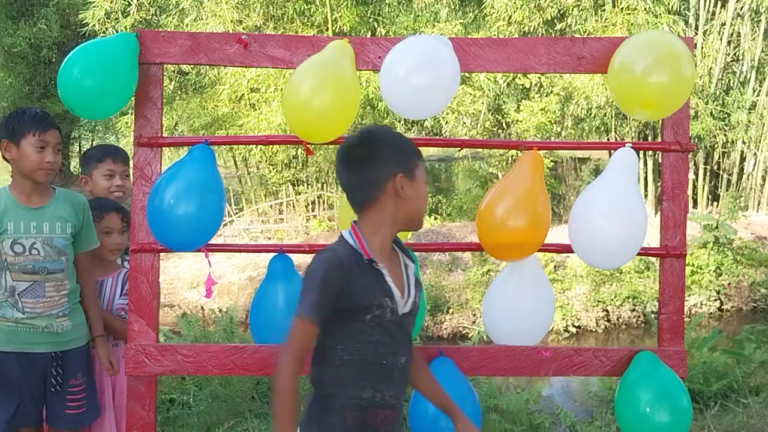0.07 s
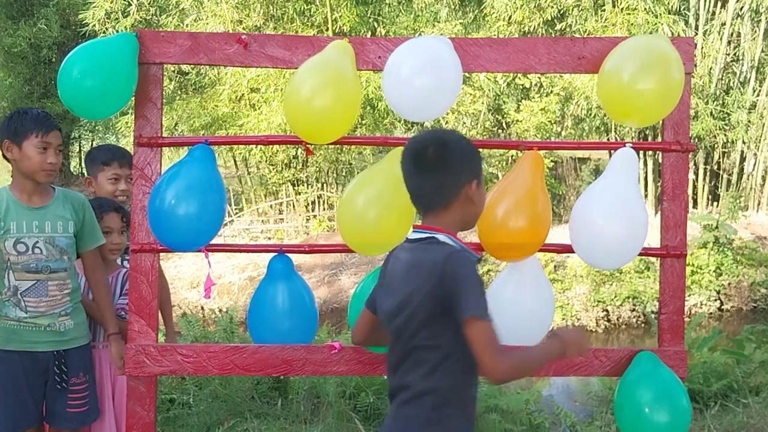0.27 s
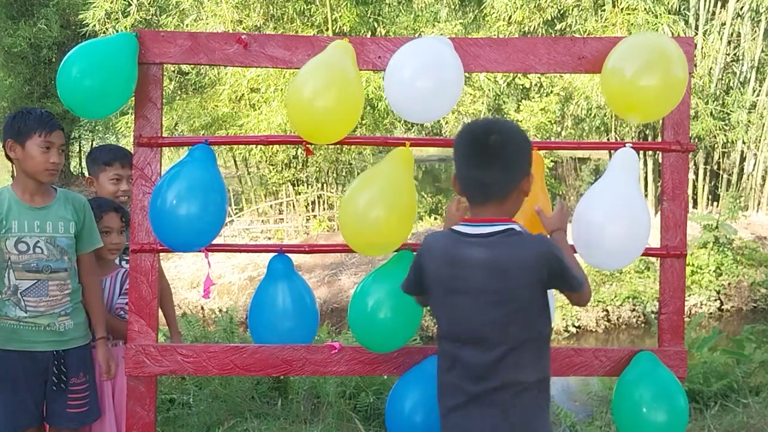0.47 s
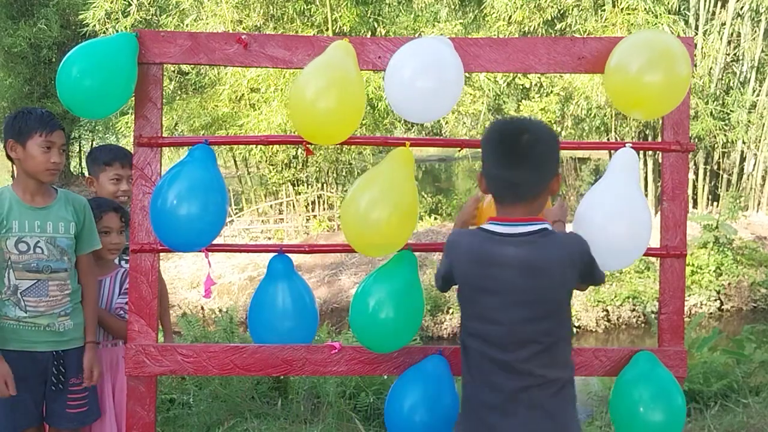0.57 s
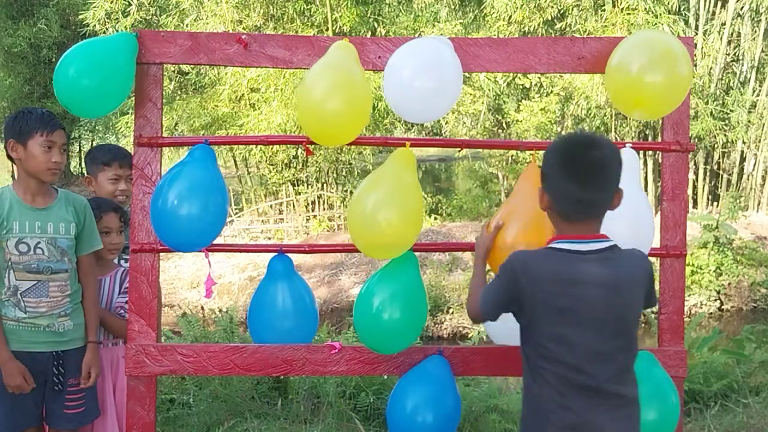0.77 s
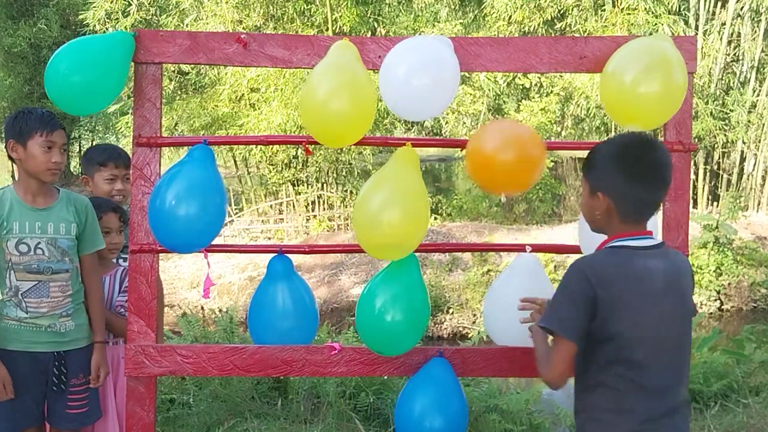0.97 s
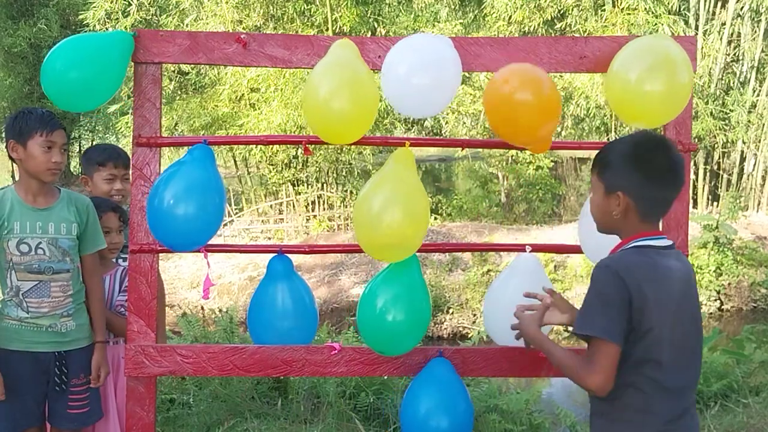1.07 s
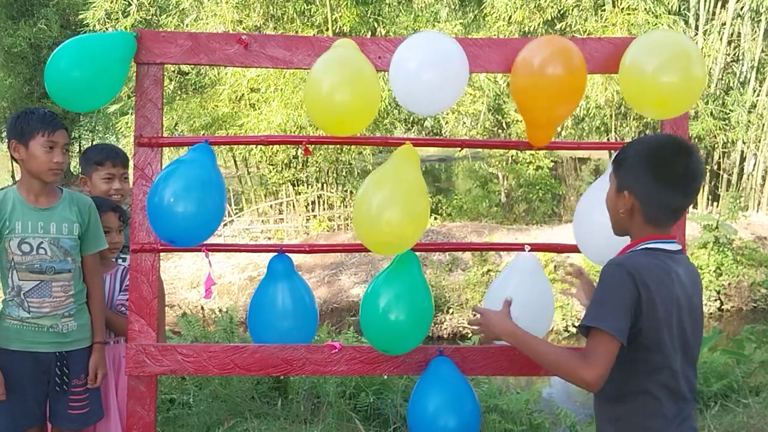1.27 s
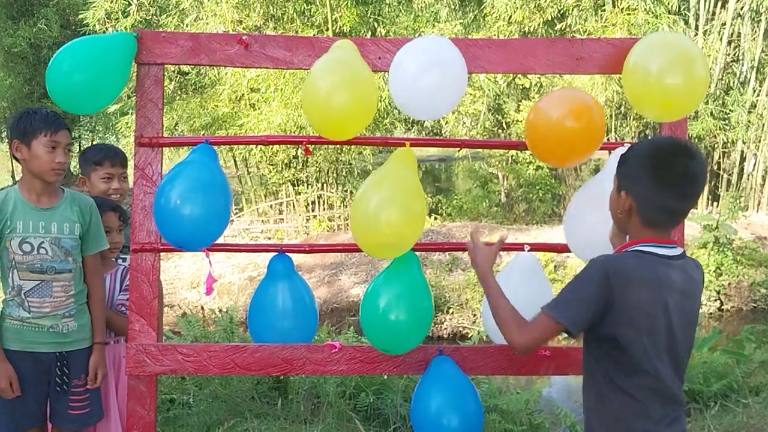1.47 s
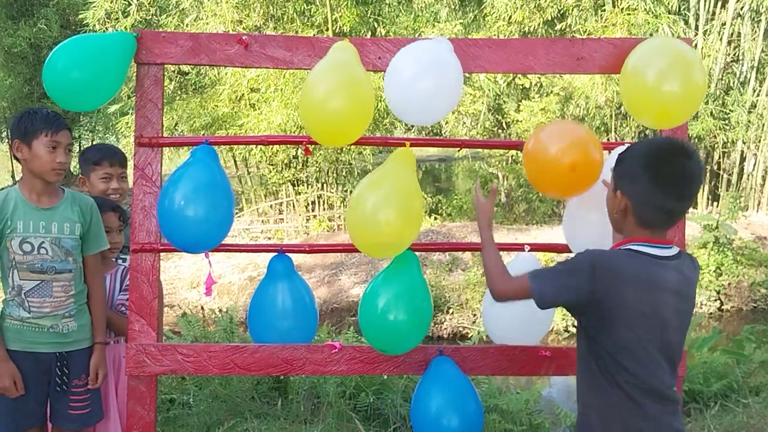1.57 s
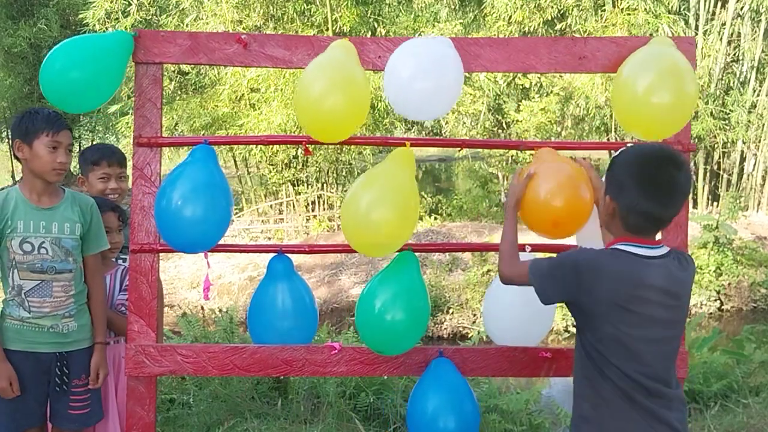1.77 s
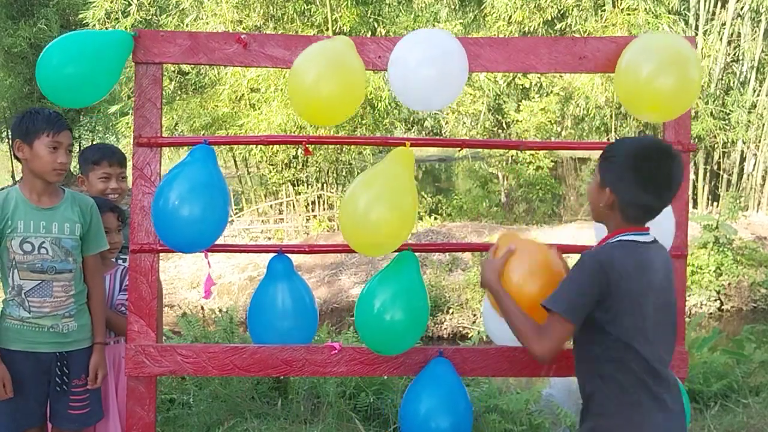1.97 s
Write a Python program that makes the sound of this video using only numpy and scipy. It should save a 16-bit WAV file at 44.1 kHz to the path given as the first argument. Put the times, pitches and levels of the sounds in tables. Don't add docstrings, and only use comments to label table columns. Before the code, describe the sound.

Hollow rubbery balloon pats and squeaky rubs in a quiet grove, ending in a loud burst

```python
import sys
import numpy as np
from scipy import signal
from scipy.fft import rfft, irfft, next_fast_len
from scipy.io import wavfile
from scipy.ndimage import map_coordinates

SR = 44100
rng = np.random.default_rng(int(sys.argv[2]) if len(sys.argv) > 2 else 0)


def boost_factor(decibels):
    exponent = np.asarray(decibels, float) / 20
    return 10 ** exponent


def waveform_to_disk(signal):
    frames = np.transpose(np.atleast_2d(signal))
    scaled = np.clip(frames, -1, 1) * 32767
    samples = np.round(scaled).astype(np.int16)
    wavfile.write(sys.argv[1], SR, samples)


N = 88420


def unit(x):
    return x / np.sqrt(np.mean(x ** 2) + 1e-20)


def along(points, hz):
    f, v = np.transpose(points)
    return np.interp(np.log(hz + 1), np.log(f + 1), v)


def curve(points):
    s, v = np.transpose(points)
    return np.interp(np.arange(N) / SR, s, v)


def wobble(rate):
    return map_coordinates(rng.standard_normal(400), [np.arange(N) * rate / SR], mode="wrap")


def filtered(x, response):
    m = next_fast_len(N + SR // 2)
    return irfft(rfft(x, m) * response(np.fft.rfftfreq(m, 1 / SR)), m)[..., :N]


def rush(gain):
    # frequency in Hz, left-right likeness (correlation).
    likeness = [(60, 0.89), (180, 0.78), (550, -0.23), (1650, 0.4), (4970, -0.25), (15000, -0.23)]

    def mid_side(hz):
        turn = np.arccos(np.clip(along(likeness, hz), -1, 1)) / 2
        return gain(hz) * [np.cos(turn), np.sin(turn)]

    mid, side = filtered(rng.standard_normal((2, N)), mid_side)
    return unit(np.array([mid + side, mid - side]))


def shaped(points):
    return lambda hz: boost_factor(along(points, hz)) * (hz > points[0][0]) * (hz < points[-1][0])


def hump(start_s, length_s, sharp):
    return np.sin(np.pi * np.clip((np.arange(N) / SR - start_s) / length_s, 0, 1)) ** sharp


def tone(hz):
    return np.sin(2 * np.pi * np.cumsum(hz) / SR)


def rings(modes, attack_s):
    t = np.arange(SR // 4) / SR
    swell = 1 - np.exp(-t / attack_s)
    return np.array([boost_factor(db - 60 * t / t60_s) * np.sin(2 * np.pi * hz * t) * swell for hz, db, t60_s in modes])


def add(track, s, x):
    part = track[round(s * SR):][:len(x)]
    part += x[:len(part)]


def open_air():
    # frequency in Hz, density in dB per Hz.
    air_spectrum = [(88, -32), (150, 3), (454, -18.5), (844, -17.5), (2870, -26.5), (5660, -18),
                    (9010, -26), (10500, -26), (15500, -30)]
    return boost_factor(-67.5 + wobble(4.8)) * rush(shaped(air_spectrum))


def rumble():
    # frequency in Hz, density in dB per Hz.
    rumble_spectrum = [(15, -60), (25, -43), (40, -10), (59, 0), (76, -1.5), (92, 1), (250, -35),
                       (320, -26), (550, -120)]
    # time in seconds, level in dB.
    gust_levels = [(0, -59), (.15, -58), (.3, -60.5), (.5, -62), (.7, -54.5), (.95, -63.5), (.985, -62),
                   (1.01, -47), (1.15, -57), (1.3, -56.5), (1.42, -47.5), (1.55, -55), (1.6, -55),
                   (1.64, -53), (1.72, -55.5), (1.78, -48), (1.87, -56), (1.96, -48)]
    return boost_factor(curve(gust_levels) + 2.5 * wobble(14.06)) * rush(shaped(rumble_spectrum))


def chorus():
    # frequency in Hz, density in dB per Hz.
    chorus_spectrum = [(9300, -18), (9700, -7.5), (10200, -3), (10700, -7.5), (11500, -13.5)]
    # time in seconds, level in dB.
    chorus_levels = [(0, -68.5), (.45, -72), (.9, -70), (1.3, -69), (1.45, -65), (2, -64.5)]
    level_db = curve(chorus_levels) + 0.8 * wobble(5.5) + 0.94 * wobble(100)
    return boost_factor(level_db) * rush(shaped(chorus_spectrum)) * boost_factor([[-3], [3]])


def far_echo():
    # time in seconds, level in dB.
    echo_levels = [
        (0, -46),
        (.06, -62),
        (.33, -75),
        (.365, -60.5),
        (.42, -73),
        (.5, -71),
    ]
    # frequency in Hz, density in dB per Hz.
    echo_spectrum = [(800, -15), (930, 4.5), (1200, 2), (1350, -25.5)]
    level_db = curve(echo_levels) + 0.5 + 2.24 * wobble(63.3)
    return boost_factor(level_db) * (np.arange(N) < 0.5 * SR) * rush(shaped(echo_spectrum))


def bird():
    # start in seconds, length in seconds, first and last frequency in Hz, level in dB.
    whistles = [
        (1.36, .085, 3780, 3720, -77),
        (1.445, .08, 3700, 3480, -77),
        (1.642, .085, 4150, 3850, -76),
        (1.722, .05, 3800, 3380, -77),
    ]
    t, out = np.arange(N) / SR, 0
    for s, length_s, from_hz, to_hz, db in whistles:
        hz = np.interp(t, [s, s + length_s], [from_hz, to_hz]) + 30 * wobble(160)
        out = out + boost_factor(db + 1.5 * wobble(80)) * hump(s, length_s, 0.17) * tone(hz)
    return out * boost_factor([[1], [-1]])


def insect(calls, hz, strokes_hz, width_hz):
    t, out = np.arange(N) / SR, 0
    for s, length_s, db in calls:
        strokes = np.sin(np.pi * strokes_hz * (t - s)) ** 2
        out = out + boost_factor(db + 2) * hump(s, length_s, 0.25) * strokes
    note = tone(hz + width_hz * wobble(170))
    return out * boost_factor([[-4], [3]]) * note * boost_factor(1.5 * wobble(60))


def insects():
    # start in seconds, length in seconds, level in dB.
    trill_calls = [
        (.16, .07, -69),
        (.3, .14, -66),
        (.525, .14, -65),
        (.785, .135, -65),
    ]
    chirp_calls = [(.262, .04, -68), (.325, .042, -66), (1.355, .012, -66), (1.44, .012, -63),
                   (1.483, .042, -65), (1.545, .042, -63), (1.617, .042, -63), (1.68, .012, -68)]
    buzz_calls = [
        (.36, .16, -76),
        (1.33, .12, -70),
        (1.45, .3, -77),
    ]
    return (insect(trill_calls, 10700, strokes_hz=108.6, width_hz=110)
            + insect(chirp_calls, 5700, strokes_hz=94, width_hz=50)
            + insect(buzz_calls, 6050, strokes_hz=72, width_hz=290))


def yard(x):
    t60_s, delay_samples = 0.31, 200
    t = np.arange(SR // 4) / SR
    tail = rng.standard_normal((2, len(t))) * boost_factor(-60 * t / t60_s)
    late = np.pad(x, (delay_samples, 0))[None]
    return signal.fftconvolve(late, tail / np.linalg.norm(tail[0]), axes=1)[:, :N]


def swishes():
    # start in seconds, length in seconds, level in dB, centre in Hz.
    slides = [(-.1, 0.13, -51, 2200), (.03, .03, -54, 2000), (.7, .07, -64, 2000), (1.03, .014, -58, 5800),
              (.0, 0.31, -64, 2700), (0.194, 0.058, -61.5, 3800), (0.429, 0.31, -61, 3000),
              (0.605, 0.041, -61.5, 8700), (0.654, 0.073, -47.5, 2400), (0.709, 0.048, -63, 11700),
              (0.718, 0.21, -68.5, 1200), (0.986, 0.019, -57.5, 4400), (0.99, 0.24, -64, 2440),
              (1.009, 0.044, -57.5, 6000), (1.064, 0.0083, -53.5, 6400), (1.14, 0.24, -56.5, 11200),
              (1.164, 0.21, -55.5, 2700), (1.266, 0.3, -66, 2370), (1.28, 0.26, -65, 8400),
              (1.704, 0.13, -59, 8300), (1.769, 0.16, -54, 9200), (1.735, 0.21, -60.5, 2040),
              (0.484, 0.36, -62.5, 13500), (0.916, 0.28, -67, 13500), (1.86, 0.11, -66, 12000),
              (.0, 0.32, -69, 13500), (0.448, 0.023, -69, 4200), (1.343, 0.55, -69.5, 7900),
              (1.748, 0.23, -63, 343), (1.015, 0.18, -55.5, 380), (-.05, 0.098, -60.5, 504)]
    out = 0
    for s, length_s, db, centre_hz in slides:
        octaves = 0.94 * min(1, 20 * length_s) ** 0.5
        hiss = rush(lambda f: np.exp(-0.5 * (np.log2((f + 1) / centre_hz) / octaves) ** 2))
        out = out + boost_factor(db + 1.5 * wobble(190)) * hump(s, length_s, 1.2) * hiss
    return out


def groans():
    # start in seconds, length in seconds, first and last frequency in Hz, level in dB.
    flexes = [
        (1.309, 0.165, 150, 82.7, -46.5),
        (1.739, 0.064, 74.8, 134, -44),
    ]
    t, out = np.arange(N) / SR, 0
    for s, length_s, from_hz, to_hz, db in flexes:
        hz = np.exp(np.interp(t, [s, s + length_s], np.log([from_hz, to_hz])))
        out = out + boost_factor(db + 3.4 * wobble(45.4)) * hump(s, length_s, 0.46) * tone(hz)
    return out


def creaks():
    # start in seconds, peak in dB, length in seconds.
    slip_runs = [(0.662, -55, 0.011), (0.997, -56.5, 0.0067), (1.073, -48, 0.0061), (.038, -49.5, 0.011),
                 (.004, -60, 0.014), (0.749, -60.5, 0.059), (1, -57.5, 0.028), (1.0273, -45, 0.023),
                 (1.065, -46, 0.021), (1.1088, -52, 0.022), (1.121, -54.5, 0.014), (1.1323, -49.5, 0.025),
                 (1.164, -51, 0.022), (1.221, -56, 0.013), (1.2384, -47.5, 0.024), (1.324, -47, 0.021)]
    # centre in Hz, width in Hz, level in dB.
    rubber_modes = [(610, 210, -4.5), (1065, 86, -0.5), (1270, 90, 3), (1654, 168, 0), (2210, 320, -11),
                    (3620, 860, -12), (6000, 1340, -17.5)]
    slips = rng.standard_normal(N) * (rng.random(N) < 0.05)
    drive = sum(boost_factor(db) * hump(s - 0.003, length_s, 0.52) for s, db, length_s in slip_runs) * slips

    def rubber(f):
        total = 0
        for k, (centre_hz, width_hz, db) in enumerate(rubber_modes):
            damping = 1j * f * width_hz
            total = total + (-1) ** k * boost_factor(db) * damping / (centre_hz ** 2 - f * f + damping)
        return total

    return boost_factor(25) * filtered(drive, rubber)


def rubbing():
    # start in seconds, length in seconds, balloon note in Hz, skin level in dB, squeak band level in dB.
    rubs = [
        (-.05, 0.3, 203, -59.5, -72),
        (0.367, 0.21, 322, -79, -72),
        (0.423, 0.4, 353, -57, -64),
        (0.79, 0.2, 320, -69.5, -74),
        (0.977, 0.23, 221, -51.5, -59),
        (1.15, 0.27, 242.5, -47, -62),
        (1.285, 0.36, 243, -53.5, -74),
        (1.719, .23, 203, -55.5, -65.5),
    ]
    squeak_band = shaped([(380, -11.5), (500, -3.0), (800, -2.5), (950, -6.5)])
    out = 0
    for s, length_s, note_hz, skin_db, squeak_db in rubs:

        def skin_gain(f):
            resonance = 1 / (1 + ((f - note_hz) / 35) ** 2)
            return (f / (f + 120)) ** 2 * (0.5 * (f < note_hz) + resonance)

        skin = unit(filtered(rng.standard_normal(N), skin_gain))
        squeak = unit(filtered(rng.standard_normal(N), squeak_band))
        lumps_db = 3 * wobble(40.11)
        friction = boost_factor(skin_db + lumps_db) * skin + boost_factor(squeak_db + lumps_db) * squeak
        out = out + hump(s, length_s, 0.6) * friction
    return out


def pats():
    # time in seconds, peak in dB, ring over thud in dB.
    pats_a = [(0.113, -57, 0), (0.154, -46, -25), (0.169, -45, -19), (0.463, -51, 7.5), (0.501, -45.5, 8.5),
              (0.53, -40, -1), (0.534, -41, -18), (0.549, -43, 8.5), (0.576, -44.5, 9.5), (0.602, -36, -21),
              (0.626, -35, 4), (0.656, -33.5, -1.5), (0.689, -32.5, -3), (0.734, -42.5, 1)]
    pats_b = [(0.996, -35, -1.5), (1.024, -28, -4), (1.111, -38, -0.5), (1.261, -37, 0.5),
              (1.332, -34.5, 4.5), (1.344, -49, -9), (1.369, -34.5, 2.5), (1.388, -35, 7),
              (1.414, -29, 1.5), (1.448, -32, 3.5), (1.488, -36.5, 5.5), (1.533, -40.5, 9),
              (1.755, -40.5, -6.5), (1.78, -42, -4), (1.05, -39, -9), (1.165, -38, 0.5), (1.205, -41, 3.5),
              (1.59, -47, 5)]
    # frequency in Hz, level in dB, t60 in seconds.
    modes_a = [(182.5, 6.5, 0.032), (340.8, -6.5, 0.14), (757, -17.5, 0.045)]
    modes_b = [(205, 1, 0.061), (259, 1.5, 0.076), (798, -24, 0.069)]
    # time in seconds, pitch factor.
    grip_a = [(.45, 1.02), (.58, 1.034), (.63, 1.003), (.75, 0.96)]
    grip_b = [(1., 1.05), (1.35, 1.037), (1.42, 0.99), (1.452, 0.95), (1.54, .99), (1.8, 1.05)]
    out = np.zeros(N)
    for hits, modes, grip, swell_s in ((pats_a, modes_a, grip_a, 0.0015), (pats_b, modes_b, grip_b, 0.005)):
        for s, db, ring_db in hits:
            squeeze = np.interp(s, *np.transpose(grip)) + 0.007 * rng.standard_normal()
            thud, *ring = rings(np.multiply(modes, [squeeze, 1, 1]), swell_s)
            add(out, s, boost_factor(db) * (thud + boost_factor(ring_db) * sum(ring)))
    return out


def released_air(hold_s):
    from_hz, to_hz, sag_s, rise_s = 265, 100, 0.0115, 0.0013
    t = np.arange(SR // 4) / SR
    hz = to_hz + (from_hz - to_hz) * np.exp(-(t / sag_s) ** 2)
    return np.exp(-(t / hold_s) ** 4) * (1 - np.exp(-t / rise_s)) * tone(hz)


def burst_boom():
    # time in seconds, skin level in dB, air level in dB, air hold in seconds.
    blows = [
        (1.9714, -18, -57, .016),
        (1.973, -40, -13.5, .0152),
        (1.9893, -26, -19, .0095),
        (1.9985, -36, -32, .01),
    ]
    # frequency in Hz, level in dB, t60 in seconds.
    skin_modes = [(521, -11.5, 0.16), (644, 5, 0.032), (916, -11, 0.046), (1200, -15.5, 0.045),
                  (1330, -21, 0.11)]
    push_mode = [(105, -12, 0.34)]
    out = np.zeros(N)
    skin, push = rings(skin_modes, 0.0028).sum(0), rings(push_mode, 0.0049)[0]
    for s, skin_db, air_db, hold_s in blows:
        add(out, s, boost_factor(skin_db) * skin - boost_factor(air_db) * (released_air(hold_s) + push))
    return out


def burst_crack():
    # frequency in Hz, density in dB per Hz.
    crack_spectrum = [(470, -38), (800, -14), (1660, -15.5), (3540, -17), (3860, -14), (6750, -26),
                      (12700, -20), (15500, -20)]
    # time in seconds, level in dB.
    shreds = [
        (1.971, -55),
        (1.9733, -34.5),
        (1.9764, -28),
        (1.979, -33.5),
    ]
    snap_t60_s, echo_s, echo_db, echo_t60_s = 0.0085, 1.972, -37, 0.26
    t = np.arange(N) / SR
    snaps = 0
    for s, db in shreds:
        t60_s = np.where(t < s, snap_t60_s / 4, snap_t60_s)
        snaps = snaps + boost_factor(db - 60 * abs(t - s) / t60_s)
    crack = shaped(crack_spectrum)
    late_s = np.maximum(t - echo_s, 0)
    echo = (1 - np.exp(-late_s / 0.0024)) * boost_factor(echo_db - 60 * late_s / echo_t60_s)
    return snaps * rush(crack) + echo * rush(lambda f: crack(f) / (1 + f / 5000))


def scene():
    left_lag_samples, near_pan_db, yard_wet_db = 4, -1.35, -15
    near = pats() + rubbing() + creaks() + burst_boom() + groans()
    pair = np.array([np.pad(near, (left_lag_samples, 0))[:N], near])
    close = (pair + swishes() + burst_crack()) * boost_factor([[near_pan_db], [-near_pan_db]])
    far = insects() + bird() + open_air() + rumble() + chorus() + far_echo()
    return close + boost_factor(yard_wet_db) * yard(near) + far


def band_limit(x):
    return signal.sosfilt(signal.butter(12, 15670, fs=SR, output="sos"), x)


def record(dry):
    low_hz = 40
    mix = filtered(dry, lambda f: (1j * f / (low_hz + 1j * f)) ** 2)
    return band_limit(mix)


dry = scene()
out = record(dry)
waveform_to_disk(out)
```